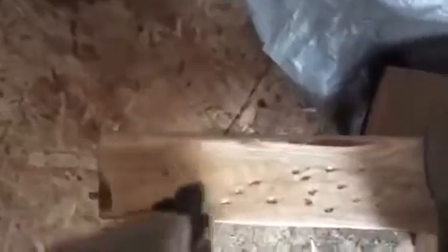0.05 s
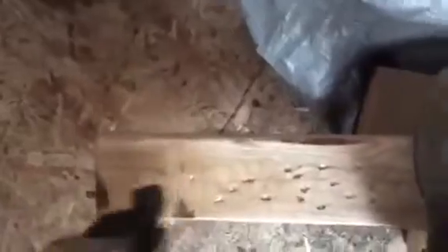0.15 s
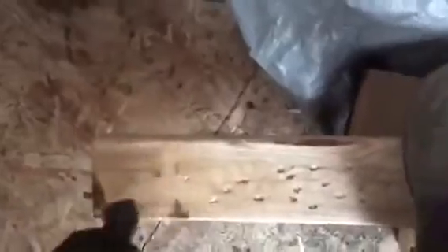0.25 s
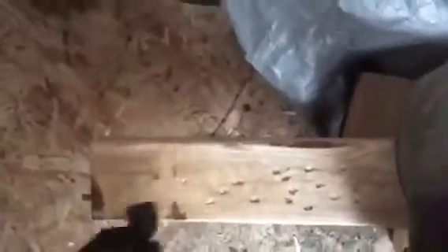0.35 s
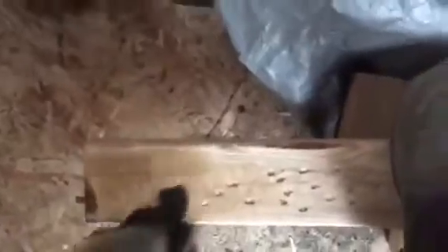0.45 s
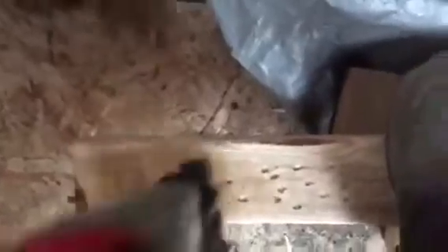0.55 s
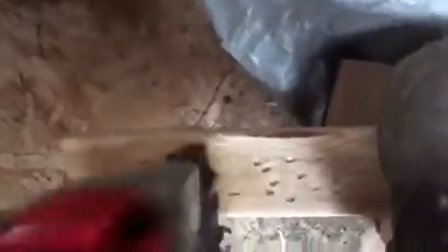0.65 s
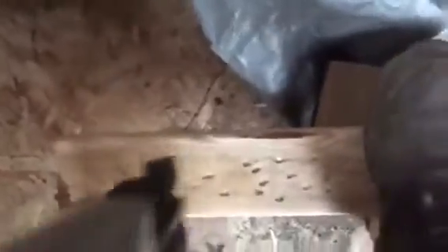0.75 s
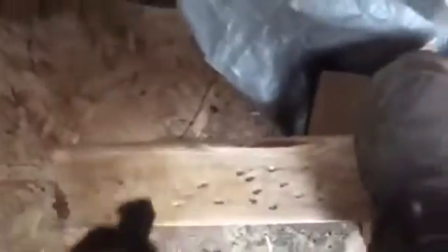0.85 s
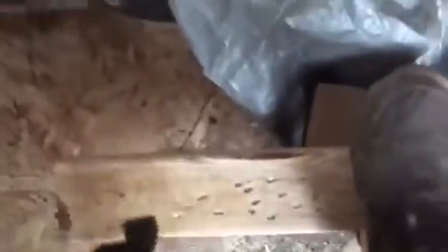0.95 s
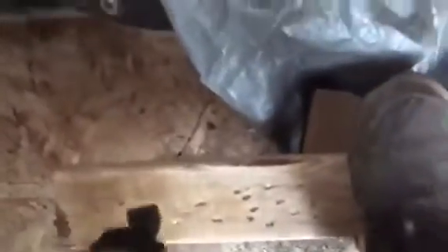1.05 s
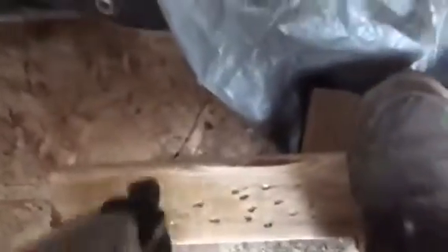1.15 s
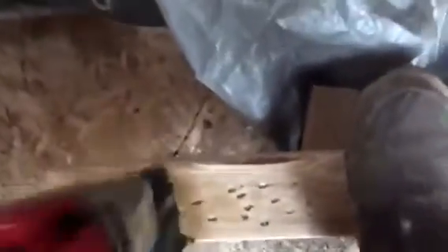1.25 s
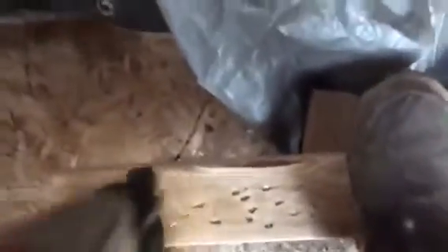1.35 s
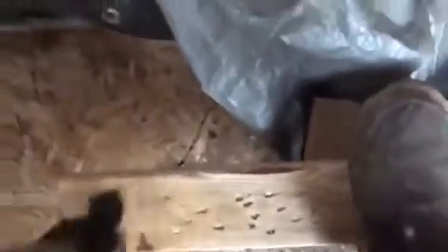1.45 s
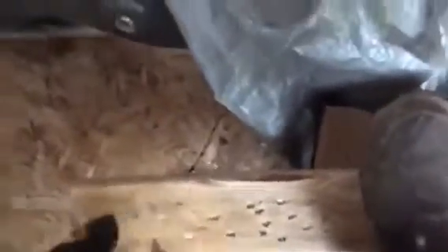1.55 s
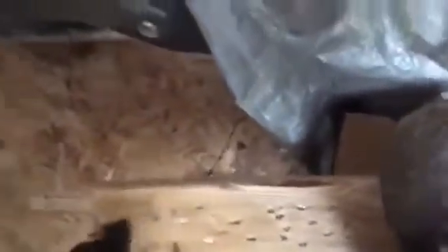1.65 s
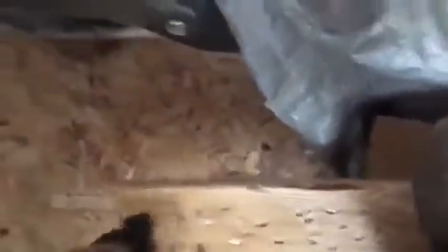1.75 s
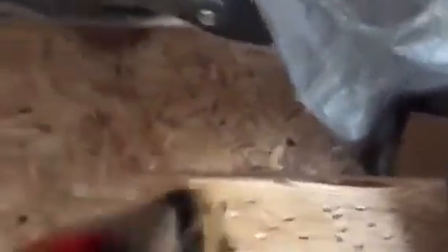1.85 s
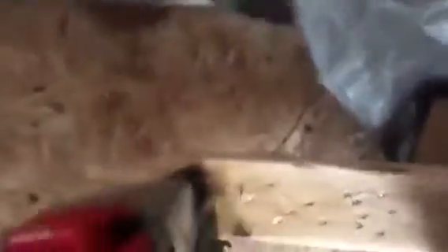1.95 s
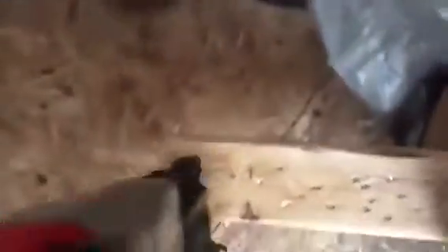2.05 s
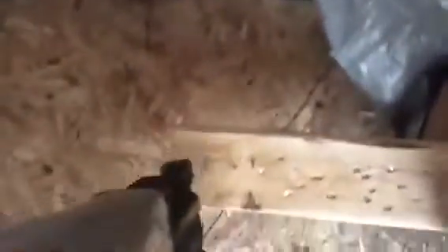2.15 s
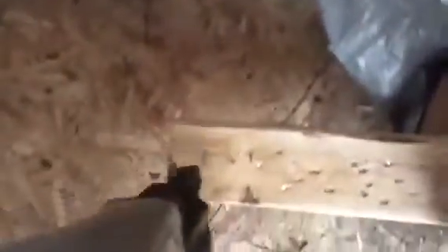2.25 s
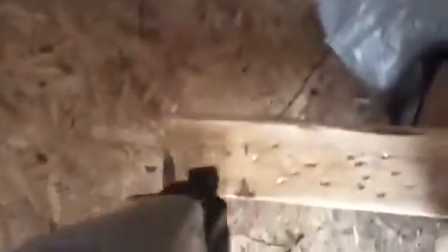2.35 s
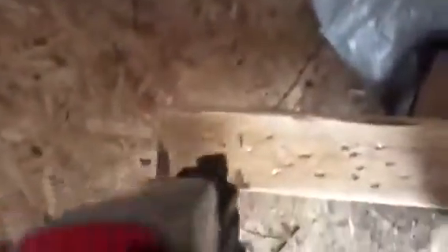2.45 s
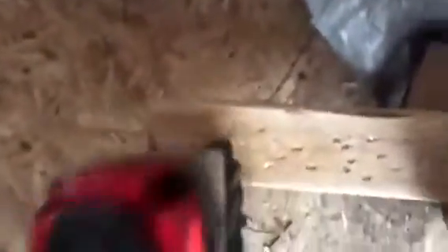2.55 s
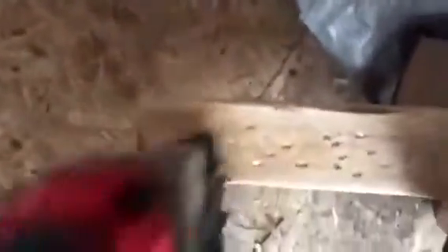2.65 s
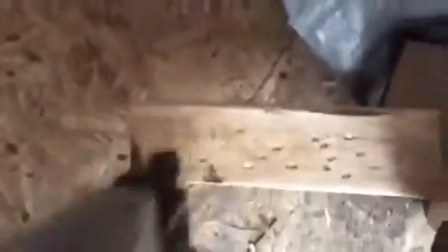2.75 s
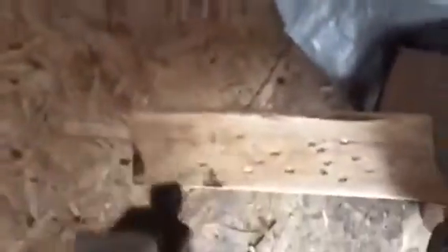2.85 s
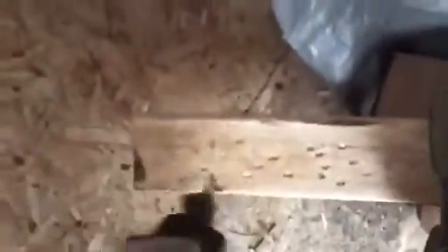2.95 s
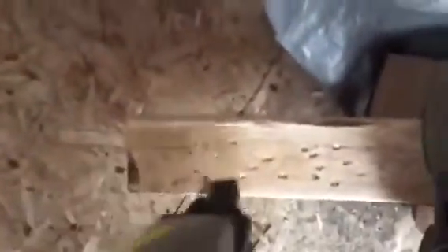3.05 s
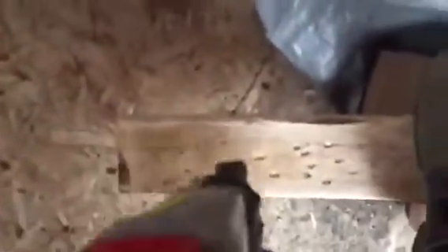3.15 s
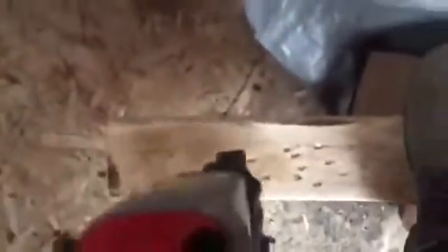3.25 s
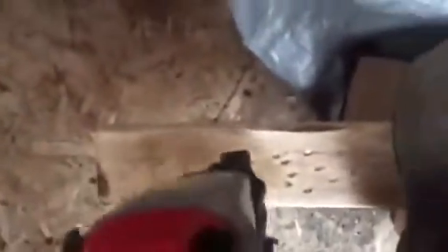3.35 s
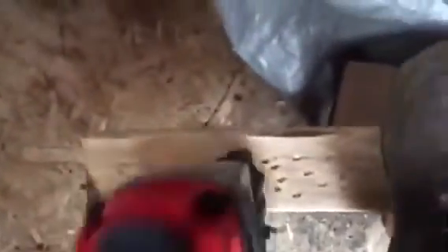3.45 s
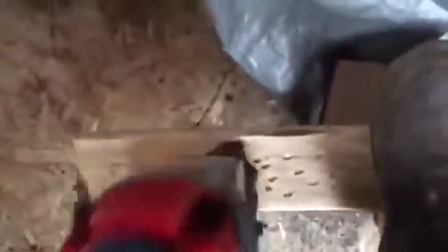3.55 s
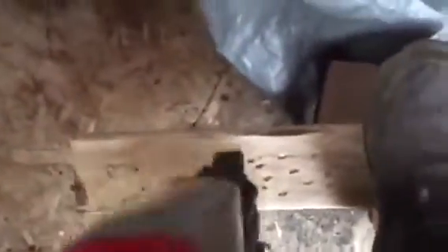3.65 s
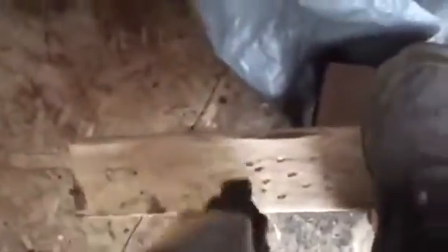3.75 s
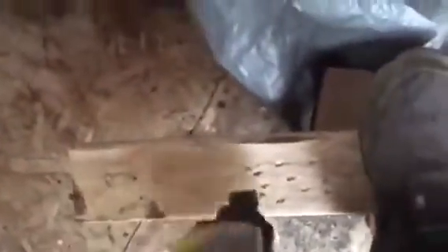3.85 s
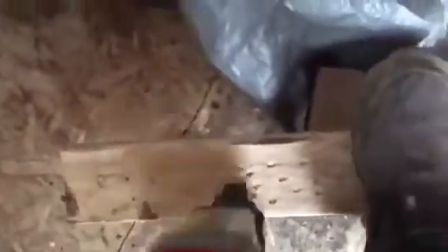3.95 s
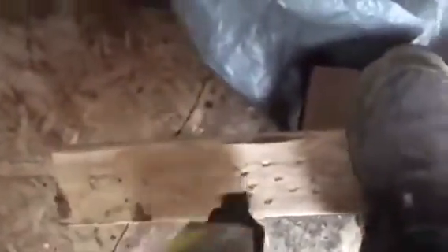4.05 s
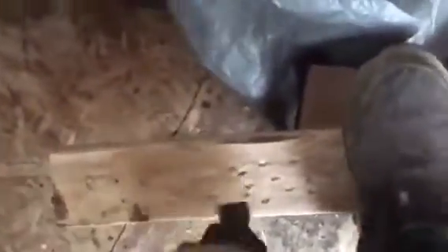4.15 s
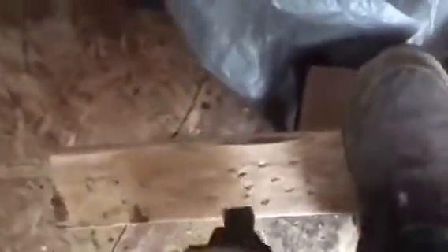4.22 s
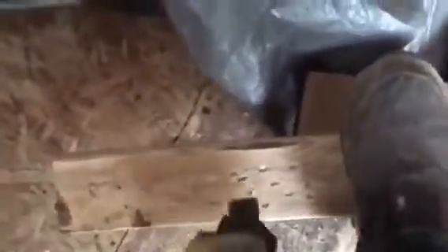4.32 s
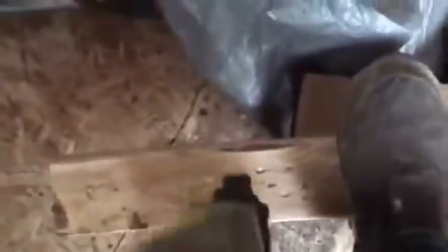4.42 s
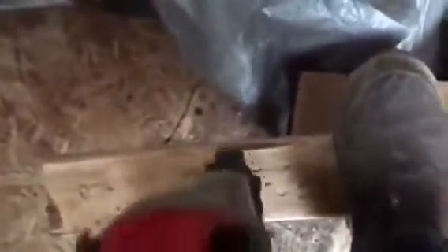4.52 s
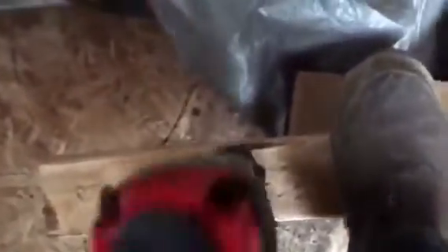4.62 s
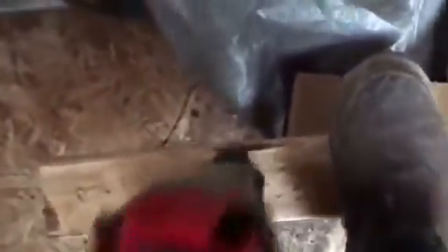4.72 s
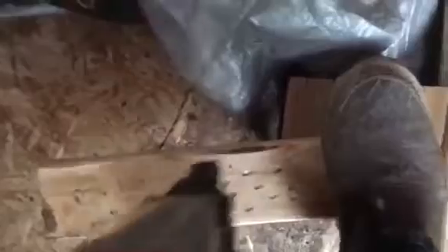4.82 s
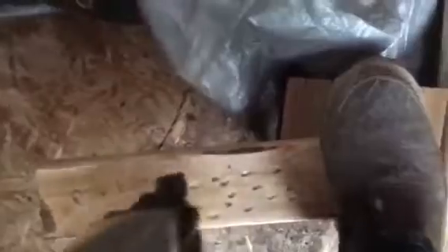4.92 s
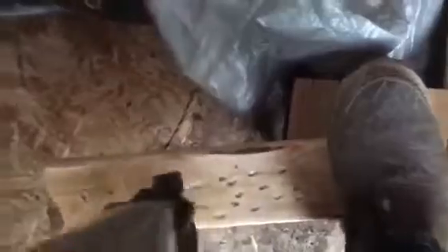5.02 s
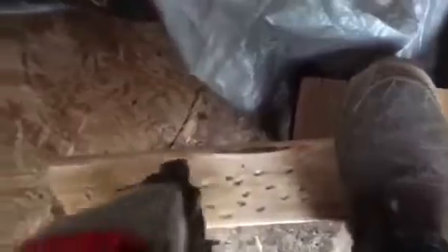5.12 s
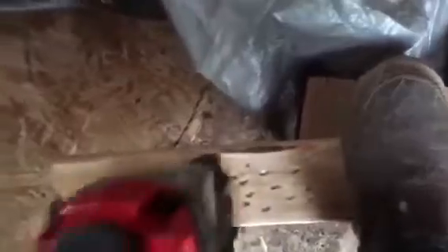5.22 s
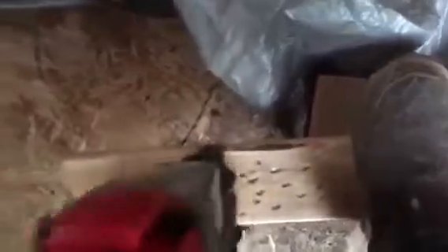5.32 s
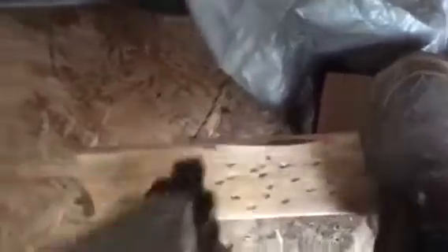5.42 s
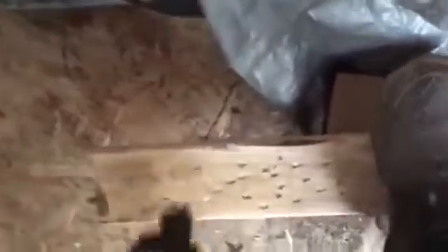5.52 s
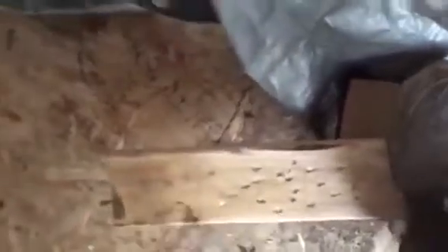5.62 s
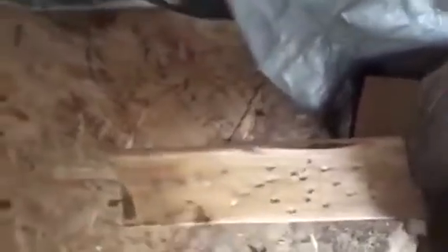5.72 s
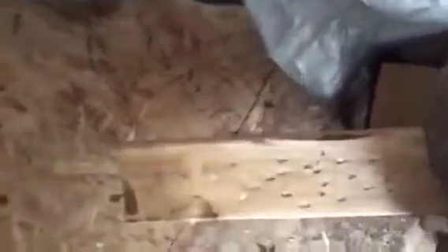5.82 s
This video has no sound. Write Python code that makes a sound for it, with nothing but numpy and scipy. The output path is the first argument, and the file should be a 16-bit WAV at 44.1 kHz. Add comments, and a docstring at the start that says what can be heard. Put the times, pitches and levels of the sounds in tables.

```python
"""Knock, air blast, hammer blow, air blast: a pneumatic nailer is bumped along a pine board on a shed floor.
Nose and driver ring the board's modes and crack the steel body; valve-gated noise is the air.
A decaying sine is the floor's boom; the tool lands and bounces. The fourth shot fires twice.
Soft set-downs, clicks, faint knocks, rumble, hiss and a mains-rate tick fill the gaps; echoes follow."""
import sys
import numpy as np
from scipy import signal
from scipy.fft import rfft, irfft, next_fast_len
from scipy.io import wavfile
from scipy.ndimage import uniform_filter1d, map_coordinates

SR = 44100
rng = np.random.default_rng(int(sys.argv[2]) if len(sys.argv) > 2 else 0)


def inscribe(sig):
    """Save sig as 16-bit PCM at rate SR to the path in sys.argv[1].

    A 1-D sig is mono; a 2-D sig holds one channel per row.
    Samples are clipped to [-1, 1] before scaling.
    """
    pcm = np.round(np.clip(np.atleast_2d(sig).T, -1, 1) * 32767)
    wavfile.write(sys.argv[1], SR, pcm.astype(np.int16))


N = 259308
T = np.arange(N) / SR  # whole scene, s
U = np.arange(SR // 2) / SR  # one short sound, s


def amp(db):
    """dB to gain."""
    return 10 ** (np.asarray(db) / 20)


def unit(x):
    """x at rms 1."""
    return x / np.sqrt(np.mean(x ** 2) + 1e-20)


def along(points, hz):
    """Interpolates (f/Hz, value) points on a log frequency axis."""
    f, v = np.transpose(points)
    return np.interp(np.log(hz + 1), np.log(f + 1), v)


def filtered(x, response):
    """x times a complex response of frequency."""
    m = next_fast_len(len(x) + SR // 2)
    hz = np.fft.rfftfreq(m, 1 / SR)
    return irfft(rfft(x, m) * response(hz), m)[:len(x)]


def coloured(spectrum):
    """Noise of rms 1 with the given spectrum."""
    return unit(filtered(rng.standard_normal(N), lambda hz: amp(along(spectrum, hz))))


def body(modes, x):
    """x through causal resonances of alternating sign, scaled so that white noise keeps its rms."""
    def response(f):
        h = 0
        for k, (centre, width, db) in enumerate(modes):
            damping = 1j * f * width
            h = h + (-1) ** k * amp(db) * damping / (centre * centre - f * f + damping)
        return h / np.sqrt(np.mean(np.abs(h) ** 2))
    return filtered(x, response)


def wobble(rate_hz):
    """Smooth random curve, rate_hz knots a second."""
    knots = rng.standard_normal(int(N * rate_hz / SR) + 4)
    return map_coordinates(knots, [T * rate_hz])


def gate(length_s, rise_s, t60_s):
    """Envelope: opens over rise_s, holds until length_s, then dies away."""
    return np.clip(U / rise_s, 0, 1) * amp(-60 * np.clip(U - length_s, 0, 1) / t60_s)


def add(track, s, sound):
    """Lays a short sound into a track at s seconds."""
    part = track[round(s * SR):][:len(sound)]
    part += sound[:len(part)]


# low rumble spectrum: f/Hz, level/dB per Hz (relative)
RUMBLE_SPECTRUM = [(12, -50), (20, -24), (42, -4.5), (59, 1.5), (87, -7.5), (220, -27.5), (290, -57),
                   (480, -120)]


def rumble():
    """Lumpy low noise; its level swells after each boom, jumps at each set-down, then decays."""
    steady_db = -59.5
    shake_db, shake_rise_s, shake_t60_s = -31, 0.069, 0.35  # against the boom
    bump_shake_db, bump_shake_t60_s = -15, 0.43  # against the set-down
    level = np.full(N, amp(steady_db))
    for s, db, _ in recoils():
        t = np.clip(T - s, 0, None)
        level += amp(db + shake_db - 60 * t / shake_t60_s) * np.clip(t / shake_rise_s, 0, 1)
    for s, db, _ in SET_DOWNS:
        add(level, s, amp(db + bump_shake_db - 60 * U / bump_shake_t60_s))
    lumps = amp(3 * wobble(18))
    return level * unit(lumps * coloured(RUMBLE_SPECTRUM))


def dip_curve_db():
    """Depth of the dip in tick and hiss: full at each shot, then back at a steady rate."""
    most_db, climb_db_per_s = 12, 15
    dip_db = np.zeros(N)
    for s, _, _ in recoils():
        t = np.clip(T - s, 0, None)
        dip_db = np.where(t > 0, np.clip(most_db - climb_db_per_s * t, 0, None), dip_db)
    return dip_db


# thin hiss spectrum: f/Hz, level/dB per Hz (relative)
HISS_SPECTRUM = [(90, -26.5), (150, -3.5), (400, -10), (550, -16), (1000, -15), (1300, -26), (2500, -24),
                 (4000, -21), (5200, -27.5), (8100, -24), (14500, -40), (16000, -47.5)]


def hiss(dip_db):
    """Thin, slowly wavering noise that takes a share of the dip."""
    level_db, dip_share = -68.5, 0.53
    return amp(level_db - dip_share * dip_db + 1.5 * wobble(1)) * coloured(HISS_SPECTRUM)


def tick(dip_db):
    """Uneven bright tick once per mains cycle: a sine restarted and damped each time."""
    mains_hz, pitch_hz, t60_s, level_db = 60, 8300, .0022, -50.5
    since = (T - .0085) % (1 / mains_hz)
    decay = amp(-60 * since / t60_s)
    spark = decay * amp(2.0 * wobble(40)) * np.sin(2 * np.pi * pitch_hz * since)
    return amp(level_db - dip_db) * spark


def background():
    """Rumble, hiss and tick."""
    dip_db = dip_curve_db()
    return rumble() + hiss(dip_db) + tick(dip_db)


def echo(x, decays):
    """Diffuse answer, each frequency at its own decay; the tool moves, so each shot has a new tail."""
    out = np.zeros(N)
    lead_s, delay_s = .035, .007  # new tail before each boom; tail after the sound
    edges = [0] + [round((s - lead_s) * SR) for s, *_ in recoils()] + [N]
    for a, b in zip(edges, edges[1:]):
        hz, t, z = signal.stft(rng.standard_normal(SR), SR, nperseg=512)
        decay = amp(-60 * t / along(decays, hz)[:, None])
        tail = signal.istft(z * decay, SR, nperseg=512)[1][:SR]
        tail = tail / np.linalg.norm(tail)
        add(out, a / SR + delay_s, signal.fftconvolve(x[a:b], tail))
    return out


# near walls: f/Hz, t60/s
SHED_DECAY = [(50, 0.51), (130, 0.69), (350, 0.36), (900, 0.32), (2000, 0.26), (4000, 0.23), (7000, 0.33),
              (11000, 0.16), (15000, 0.25)]
# farther surfaces: f/Hz, t60/s
YARD_DECAY = [(50, 0.88), (300, 0.78), (700, 0.71), (1500, 0.8), (3000, 0.56), (6400, 0.53), (14000, 0.1)]
# what the walls return: f/Hz, level/dB
WALL_RETURN = [(200, 0), (650, -1), (1100, 4.5), (2000, 5), (4000, 1), (9000, -3), (11500, 3), (14000, 4)]


def room(wood, air, floor, soft):
    """Near and far diffuse echoes, coloured by the walls; set-downs feed only the far one."""
    near_send = amp(-14.5) * wood + amp(-18.5) * air + amp(-14.5) * floor
    far_send = amp(-31) * wood + amp(-36.5) * air + amp(-25.5) * floor + amp(-15.0) * soft
    answer = echo(near_send, SHED_DECAY) + echo(far_send, YARD_DECAY)
    return filtered(answer, lambda hz: amp(along(WALL_RETURN, hz)))


# tiny clicks of loose parts: t/s, level/dB (nominal peak), f/Hz, length/s
LOOSE_PARTS = [(0.686, -53, 3860, 0.0089), (1.335, -55, 3760, 0.012), (1.968, -58, 3520, 0.0098),
               (2.401, -63, 3810, 0.0028), (2.64, -60, 4225, 0.0026), (3.220, -56, 6240, .002),
               (3.239, -61, 4300, 0.0038), (3.331, -53, 3600, 0.0134), (3.416, -57, 4440, .002),
               (3.533, -46, 4190, 0.0015), (4.44, -70, 3960, 0.0017), (4.641, -63, 4790, .002),
               (4.732, -56, 4010, 0.0021), (5.268, -59, 3830, 0.0019), (5.336, -64, 4270, .002)]


def clicks():
    """Brief noise scratches through a resonance and a weaker one an octave below."""
    out = np.zeros(N)
    for s, db, hz, length_s in LOOSE_PARTS:
        scratch = gate(length_s, 0.0011, 0.0082)[:SR // 20] * rng.standard_normal(SR // 20)
        add(out, s, amp(db - 8.5) * body([(hz, 900, 0), (hz / 2.0, 900, -9)], scratch))
    return out


def chatter(length_s, gap_s, width_s):
    """One full contact, then uneven smaller ones of either sign; each a Gaussian push."""
    draw = rng.standard_normal((40, 2))
    times = np.cumsum(gap_s * np.exp(0.42 * draw[:, 0]))
    sizes = np.where(times < length_s, .7 * draw[:, 1], 0)
    t = U[:SR // 8]
    pushes = np.zeros(len(t))
    for s, size in zip([0, *times], [1, *sizes]):
        if size:
            pushes += size * np.exp(-((t - s - 4 * width_s) / width_s) ** 2)
    return pushes / width_s ** .5


# soft set-downs of the nose: t/s, level/dB (nominal peak), rumble length/s
SET_DOWNS = [(0.067, -38, 0.05), (0.103, -36.5, 0.022), (0.699, -27.5, 0.052), (1.353, -25.5, 0.063),
             (1.92, -47.5, 0.023), (1.989, -26.5, 0.05), (2.689, -36, 0.033), (3.347, -25, 0.05),
             (3.364, -52, 0.05), (3.572, -35.5, 0.05), (3.579, -38, 0.038), (4.624, -46.5, 0.05),
             (5.3, -39, 0.047)]
# board under soft contact: f/Hz, width/Hz, level/dB
PLANK_MODES = [(80, 25, -2.5), (145, 52, 2.5), (239.14, 92, 8), (430, 120, -7), (610, 120, -9.5),
               (850, 180, -13.5)]


def bumps():
    """Dull contacts: a chattering push and a noise rumble through the plank, low-passed."""
    push = np.zeros(N)
    for s, db, length_s in SET_DOWNS:
        add(push, s, amp(db) * 0.0055 * chatter(.012, gap_s=0.0029, width_s=0.0002))
        add(push, s, amp(db - 15) * gate(length_s, 0.0044, .3) * rng.standard_normal(len(U)))
    return filtered(body(PLANK_MODES, push), lambda f: 1 / (1 + 1j * f / 1300) ** 3)


def recoils():
    """Floor swing after each stroke: (t/s, level/dB, f/Hz)."""
    return [(s + wait, db, hz) for s, *_, wait, db, hz, _, _, _, _ in STROKE_EVENTS]


def booms():
    """The recoil swings the floor for two or three cycles after a short dip."""
    out = np.zeros(N)
    for s, db, hz in recoils():
        t = T - s
        onset = np.exp(-(t / 0.0042) ** 2)
        decay = amp(-60 * np.clip(t, 0, 1) / 0.11)
        swell = np.where(t > 0, decay, onset)
        out += amp(db) * swell * np.sin(2 * np.pi * hz * t)
    return out


def valves():
    """Air drives the piston until it bottoms out, then exhausts: (opens/s, shuts/s, first/dB, last/dB, dB/oct)."""
    intake_shuts_s, intake_tilt_db = .004, 1.5  # after bottoming; per octave
    exhaust_opens_s, exhaust_tilt_db = .011, -1.5
    ends = np.array([row[0] for row in STROKE_EVENTS])
    rows = []
    for s, _, _, wait, db, drop_db in NOSE_EVENTS:
        bottom = ends[ends > s][0]
        rows.append((s + wait, bottom + intake_shuts_s, db, db - drop_db, intake_tilt_db))
    for s, _, _, _, _, _, db, drop_db, shut, *_ in STROKE_EVENTS:
        rows.append((s + exhaust_opens_s, s + shut, db, db - drop_db, exhaust_tilt_db))
    return rows


# air jet spectrum: f/Hz, level/dB per Hz (relative)
JET_SPECTRUM = [(530, -35), (900, -6), (1230, -12), (2040, -13.5), (2360, -7.5), (3340, 1.5), (3640, 0),
                (4310, 1), (4800, -4), (6560, -2), (7580, -4.5), (8980, 2), (14400, -17), (15400, -14),
                (16000, -64.5)]


def blasts():
    """Turbulent air: level slides, mostly down, while the valve is open, then dies away; eddies make patches."""
    out = np.zeros(N)
    for s, end, first_db, last_db, tilt in valves():
        _, _, z = signal.stft(rng.standard_normal(len(U)), SR, nperseg=128)
        patches = uniform_filter1d(rng.standard_normal(z.shape), 5, 0)  # over frequency
        eddies = unit(uniform_filter1d(patches, 4, 1))  # over time
        jet = signal.istft(z * amp(2.1 * eddies), SR, nperseg=128)[1][:len(U)]
        jet = unit(filtered(jet, lambda f: amp(along(JET_SPECTRUM, f) + tilt * np.log2((f + 1) / 5000))))
        slide = amp(np.interp(U, [0, end - s], [first_db, last_db]))  # down or up
        add(out, s, slide * gate(end - s, 0.0026, 0.069) * jet)
    return out


# nose hits the board and trips the valve: t/s, ring level/dB, damped after/s, air flows after/s,
# air level/dB, air level drop/dB
NOSE_EVENTS = [(.129, -13, 0.011, .012, -13.5, 7.5), (0.7449, -17, .012, 0.0062, -13.5, 9.5),
               (1.3985, -17, .010, .0075, -12, 12.5), (2.0177, -15, 0.007, .0085, -13, 7),
               (2.7257, -15, 0.01, 0.0085, -12.5, 6), (3.63, -15.5, 0.017, 0.0082, -11, 10.5),
               (4.085, -22, .012, .007, -15.5, 10.5), (4.791, -24.5, .025, 0.0092, -12, 12.5),
               (5.3821, -22.5, .024, 0.0077, -14, 9.5)]
# driver strokes, times relative to bottoming unless noted: bottoming t/s, time since meeting the nail/s,
# ring level/dB, damped after/s, crack level/dB, deep modes/dB, exhaust level/dB,
# exhaust level drop/dB (negative: rises), exhaust shuts/s, floor swings/s, boom level/dB, boom f/Hz,
# tool lands/s, landing level/dB, landing to last bounce/s, bounce level/dB
STROKE_EVENTS = [(.182, .010, -11, .012, -15, 0.5, -17.5, -4, .033, 0.028, -10.5, 54.2, .036, -12.5, .011, -19),
                 (.783, .013, -11, 0.011, -17, 2, -10, 2.5, 0.024, 0.02, -8.5, 56.1, .033, -21, 0.01, -17.5),
                 (1.430, .015, -11.5, .016, -17, 3.5, -13.5, 1.5, .029, .022, -7, 57, .036, -15.5, .020, -22.5),
                 (2.066, 0.01, -10.5, 0.014, -16.5, 2.5, -13.5, 3.5, .037, .016, -10, 61, 0.032, -31, 0.0079, -33),
                 (2.113, .008, -9.5, 0.0091, -18.5, -2, -14.5, -3, 0.018, .018, -18, 58, .031, -22, .013, -19),
                 (2.764, .014, -10.5, .016, -17.5, -1, -12.5, 4, .034, .036, -11.5, 59.6, .045, -17.5, .009, -21),
                 (3.668, .013, -9.5, .012, -16.5, -2.5, -10.5, 6, .031, 0.015, -9.5, 58.4, .037, -12.5, .011, -16.5),
                 (4.116, 0.012, -8, 0.013, -17.5, -2, -14.5, -1.5, 0.043, .030, -17.5, 53.7, .048, -19, .018, -19.5),
                 (4.824, .004, -8.5, 0.013, -20, 0, -13, 2.5, .030, 0.035, -16, 53, .036, -15.5, .016, -13),
                 (5.420, .012, -6.5, .006, -17.5, -3, -15, -5.5, .017, .020, -11.5, 51.4, .033, -21.5, 0.0098, -15)]
# faint knocks of the board: t/s, ring level/dB
FAINT_KNOCKS = [(2.401, -49.5), (2.439, -55), (2.490, -57)]


def blows():
    """Every contact: (t/s, ring/dB, damped after/s, crack/dB, deep modes/dB re ring)."""
    rows = []
    for s, db, damped, *_ in NOSE_EVENTS:
        rows.append((s, db, damped, db - 13, -1))
    for s, db in FAINT_KNOCKS:
        rows.append((s, db, .025, db - 24, -5))
    for s, lead, db, damped, crack_db, deep_db, *_, land, land_db, bounce, last_db in STROKE_EVENTS:
        rows += [(s - lead, db - 7, 0.0067, crack_db, 4.5 + deep_db),  # driver meets nail
                 (s, db, damped, crack_db - 0.5, -1 + deep_db),  # bottoms out
                 (s + land, land_db, 0.011, land_db - 12, 4 + deep_db),  # tool lands
                 (s + land + bounce, last_db, 0.0053, last_db - 15.5, deep_db)]  # last bounce
    return rows


# board modes: f/Hz, level/dB, t60/s
BOARD_MODES = [(98.5, -10.5, 0.29), (154.4, -8.5, 0.45), (234, -6, .12), (283.4, -5, .12),
               (423.3, -8.5, 0.34), (490, -6, 0.12), (586, -2, 0.078), (639.6, -2.5, 0.27),
               (709, -0.5, 0.079), (831, -4.5, 0.093), (1025, -7, 0.1), (1300, -7.5, .04),
               (1922, -15.5, 0.11), (2780, -18, .015)]
# tool body: f/Hz, width/Hz, level/dB
STEEL_MODES = [(1860, 3200, -9), (2566, 700, 0), (3190, 290, -1), (3900, 430, 4), (6400, 870, -6),
               (9000, 6000, -14)]


def knocks():
    """Each blow rings the board at new strengths until the nose damps it; the steel body cracks with it."""
    deep_below_hz, high_above_hz = 320, 900
    wood, steel = np.zeros(N), np.zeros(N)
    hz, level, t60 = np.transpose(BOARD_MODES)[:, :, None]
    t = U[:SR // 6]
    for s, db, damped, crack_db, deep_db in blows():
        draw = rng.standard_normal((3, len(BOARD_MODES), 1))  # strength, pitch, phase
        hardness_db = .5 * (crack_db - db + 4.5)  # a harder blow reaches the high modes
        tilt_db = deep_db * (hz < deep_below_hz) + hardness_db * (hz > high_above_hz)
        strength = amp(level + tilt_db + 1.9 * draw[0] - 60 * t / t60)
        phase = 2 * np.pi * hz * (1 + 0.037 * draw[1]) * t + 0.5 * draw[2]
        ring = np.sum(strength * np.sin(phase), axis=0)
        add(wood, s, amp(db - 1.5) * gate(damped, 0.00067, 0.054)[:len(t)] * ring)
        snap = 1.2 * gate(.001, .0003, .006)
        add(steel, s, amp(crack_db) * (gate(damped, .0012, .03) + snap))
    grit = amp(0.47 * wobble(500)) * rng.standard_normal(N)
    return wood + body(STEEL_MODES, steel * unit(grit))


def scene():
    """Direct sound, two echoes and the background."""
    wood, air, floor, soft = knocks(), blasts(), booms(), bumps()
    direct = wood + air + floor + soft
    return (direct + room(wood, air, floor, soft) + clicks() + background())[None]


def record(dry):
    """The input stage rounds off the peaks; the microphone fades at both ends, nothing passes the band limit."""
    ceiling, low_cut_hz, top_hz = .74, 32, 16290
    x = dry[0] / (1 + np.abs(dry[0] / ceiling) ** 5) ** (1 / 5)
    fade = [(15000, 0), (15400, -14), (16300, -30)]  # f/Hz, level/dB

    def microphone(hz):
        low_cut = (1j * hz / (low_cut_hz + 1j * hz)) ** 2
        return amp(along(fade, hz)) * (hz < top_hz) * low_cut
    return filtered(x, microphone)[None]


dry = scene()
out = record(dry)
inscribe(out)
```